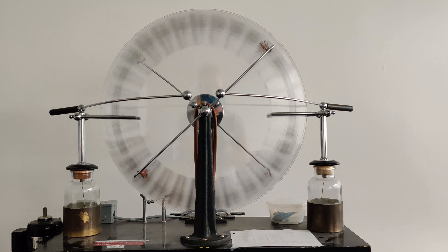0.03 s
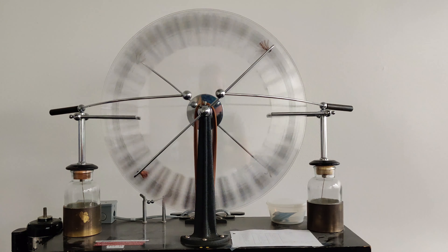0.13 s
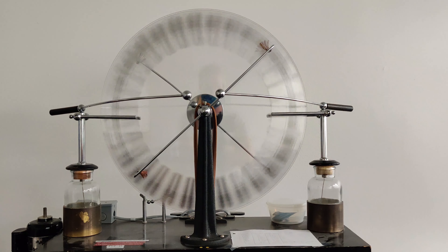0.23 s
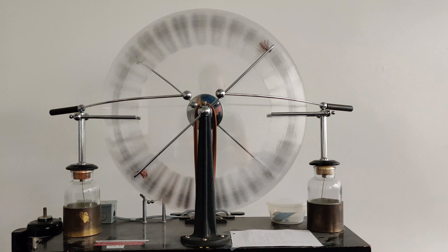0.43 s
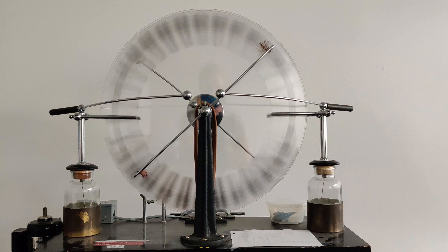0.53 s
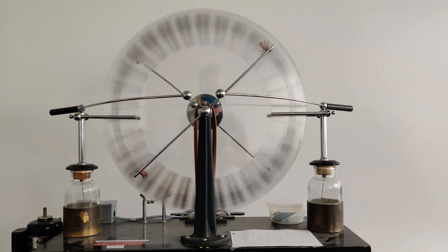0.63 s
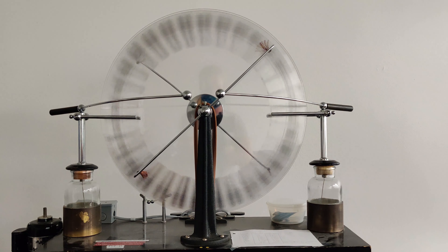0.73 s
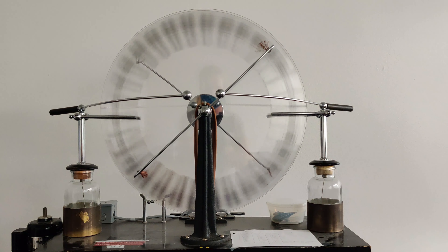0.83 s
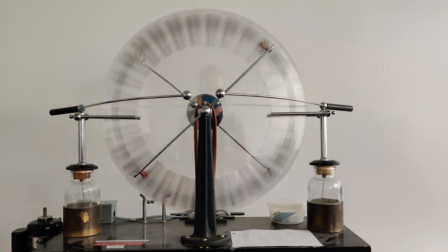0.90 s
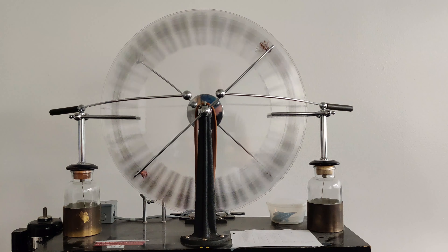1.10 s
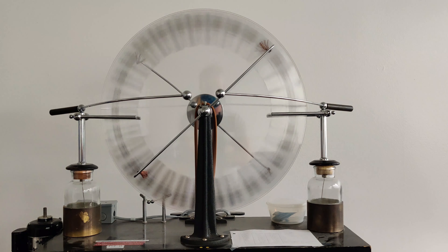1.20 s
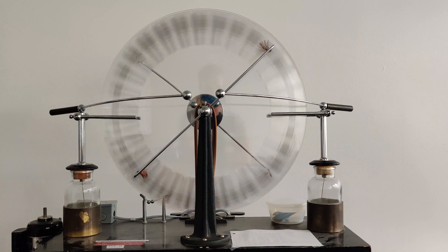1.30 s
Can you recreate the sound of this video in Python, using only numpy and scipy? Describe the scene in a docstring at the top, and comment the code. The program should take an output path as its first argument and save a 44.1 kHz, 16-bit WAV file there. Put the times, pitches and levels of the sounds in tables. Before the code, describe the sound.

A single loud spark snaps and echoes briefly while a hand-cranked generator turns quietly.

```python
"""A hand-cranked spark machine

An electrostatic machine turns in a small hard room: its discs rumble, its brushes hiss and tick, its
drive knocks and the table hums along. One big spark jumps the gap: a sharp crack, a few quick
reflections and a bright room tail. The spark upsets the microphones: they go quieter for a tenth
of a second, and their bias (resting voltage) thumps and swings slowly back."""
import sys
import numpy as np
from scipy import signal
from scipy.fft import rfft, irfft
from scipy.io import wavfile
from scipy.ndimage import uniform_filter1d

SR = 44100
rng = np.random.default_rng(int(sys.argv[2]) if len(sys.argv) > 2 else 0)


def to_wav(s):
    """Save 16-bit WAV."""
    ch = np.atleast_2d(s).T  # columns
    pcm = np.round(np.clip(ch, -1, 1) * 32767)  # PCM
    wavfile.write(sys.argv[1], SR, pcm.astype(np.int16))


N = 59535

# Each TONE table gives only the balance of low and high pitches; loudness is set separately.
# the crack and its near reflections: delay_s, left_db, right_db
CRACK_PATHS = [(0, 7, 7), (.00122, -1, -1), (.0032, -5, -3), (.0061, -3, -3), (.0117, -10, -10)]
# tone of the crack: pitch_hz, level_db
CRACK_TONE = [(100, -36.5), (400, 3), (1000, 3.5), (1500, -11), (2500, -2.5), (4700, 2.5), (7000, -3),
              (11000, -0.5), (15000, 1), (17000, 6.5)]
# starting tone of the room tail and its time to fade by 60 dB: pitch_hz, level_db, fade_s
ROOM_TONE = [(150, -18, 0.47), (503, -20, 1), (1050, -8, 0.83), (1780, -3, 0.9), (3020, -2, 1.0),
             (4760, 2, 1), (6980, -4, 0.8), (8340, 0.5, 0.6), (10970, 0.5, 0.44), (15100, 7.5, 0.31),
             (17000, -2, 0.4)]
# late echoes that stand out of the tail: delay_s, width_s, boost_db
LATE_ECHOES = [(.1565, 0.0028, 4.5), (0.2187, 0.00081, 10.5)]
# the stronger brush sparks: start_s, relative_db
LOUD_TICKS = [(.0033, -21.5), (.0072, -23), (0.0305, -22), (0.035, -25), (0.0568, -21), (.0614, -22.5),
              (.1119, -28), (.1167, -25), (0.1294, -29), (0.1642, -19), (0.6567, -29.5), (1.0448, -26.5),
              (1.0963, -27), (1.3196, -25)]
# tone of a brush spark: pitch_hz, level_db
TICK_TONE = [(500, -14), (2000, -25), (5000, -6.5), (8000, 3), (12000, 3), (15000, 6), (17000, 1)]
# knocks in the drive: start_s, relative_db
DRIVE_KNOCKS = [(0.091, -16.5), (0.111, -12), (0.566, -10), (0.5905, 3), (.6137, -2), (0.629, -7.5),
                (0.651, -10), (0.948, -10.5), (0.962, -9), (1.093, -15), (1.109, -21.5)]
# notes of the knocked part, with time to fade by 60 dB: pitch_hz, relative_db, fade_s
DRIVE_NOTES = [(1314, 0.5, .034), (1410, -32, 0.024), (2130, -19, 0.033), (2750, -16.5, 0.033),
               (3010, -23, 0.019)]
# tone of the click as parts meet: pitch_hz, level_db
CLICK_TONE = [(300, -15), (1300, 2), (2800, -1), (4000, -15), (12000, -28)]
# tone of the turning discs: pitch_hz, level_db
DISC_TONE = [(20, -6), (100, -11), (200, -5), (300, -4), (400, -4.5), (600, -5.5), (850, -5.5),
             (1100, -10.5), (1600, -22), (3000, -20), (6000, -37.5), (16000, -64)]
# pitches where the discs ring: pitch_hz, width_hz, boost_db
DISC_PEAKS = [(496, 46, 7.5), (534, 24, 7.9), (667.3, 24, 6.5), (781.4, 36, 7.2), (973, 116, 3.5),
              (1330, 93, 10.6), (1672, 39, 11.3), (2444, 57, 11.5), (2660, 100, 5)]
# swell of the disc rumble: time_s, level_db
DISC_SWELL = [(0, -49.5), (.17, -49.5), (.35, -48), (.5, -44.5), (.61, -43), (.7, -46), (.82, -46),
              (.92, -44), (1.03, -46), (1.35, -51)]
# tone of the rubbing brushes: pitch_hz, level_db
HISS_TONE = [(300, 1.5), (1700, 0.5), (3000, 3.5), (3800, -4.5), (5600, -7), (8000, -5), (11000, -5),
             (13500, -0.5), (15300, 6), (16500, 0.5)]
# pitches where the brushes ring: pitch_hz, width_hz, boost_db
HISS_PEAKS = [(4180, 480, 6), (4760, 250, 15.2), (5990, 180, 9), (6520, 320, 8.9)]
# swell of the brush hiss: time_s, level_db
HISS_SWELL = [(0, -46), (.18, -48.5), (.4, -47.5), (.8, -50), (1.35, -48)]
# tone of the table's rumble: pitch_hz, level_db
TABLE_TONE = [(13, 13), (25, 7), (50, 2), (100, -0.5), (160, -5), (260, -11.5), (500, -24.5), (2000, -47)]
# pitch where the table rings: pitch_hz, width_hz, boost_db
TABLE_PEAKS = [(189.2, 21, 11.4)]
# jolts to the microphones' bias: start_s, left_size, right_size, rise_s, left_swing_hz, left_decay_s
BIAS_JOLTS = [(.1907, .11, .33, .0004, 4.2, .09), (.2825, 0, -.13, .002, 1.0, .25),
              (.3042, -.15, -.15, .0014, 1.05, .25), (.3045, -.28, -.52, .013, 1.03, .32)]

SPARK_S, CRACK_DB, ROOM_DB = .1903, 12.5, -14.5
SIDES = np.array([[1], [-1]])  # plus for left, minus for right
LEAN_LEFT_DB = 2.5  # discs and drive are this much louder on the left


def spark():
    """The big spark cracks, bounces off the table, discs and wall, then fills the room."""
    cracks = sum(snap(SPARK_S + delay_s) * undb([[left_db], [right_db]])
                 for delay_s, left_db, right_db in CRACK_PATHS)
    return undb(CRACK_DB) * colour(cracks, CRACK_TONE) + undb(ROOM_DB) * room_tail(SPARK_S)


def snap(start_s):
    """A spike of air pressure, a little later on the right, then a brief scatter off nearby metal."""
    right_lag_s, scatter_s = .00005, .00076
    t = since(start_s)
    spike = np.sinc(np.arange(N) - np.round(start_s * SR) - np.array([[0], [right_lag_s * SR]]))
    out = spike + .22 * noise() * np.exp(-t / scatter_s) * (t > 0)
    return out / np.sqrt(np.sum(out ** 2, axis=1, keepdims=True))


def room_tail(start_s):
    """Echoes off the hard walls blur into a wash of noise; the high treble dies soonest."""
    build_s, early_s = .0017, .0059
    t = since(start_s)
    hz = np.maximum(np.fft.rfftfreq(N, 1 / SR), 1)
    band_hz, _, fades_s = np.array(ROOM_TONE).T
    wash = rfft(colour(noise(), ROOM_TONE))
    tail = 0
    for band, fade_s in zip(np.eye(len(band_hz)), fades_s):
        share = np.interp(np.log(hz), np.log(band_hz), band)
        tail += irfft(wash * share, N) * fade(t, fade_s)
    echo_db = sum(db * np.exp(-((t - delay_s) / width_s) ** 2) for delay_s, width_s, db in LATE_ECHOES)
    ripple_db = .6 * wander(rate_hz=120.5)
    early_lift = 1 + undb(-32) * np.exp(-t / early_s)
    return tail * undb(echo_db + ripple_db) * rise(t, build_s) * early_lift


def brush_sparks():
    """A tiny spark ticks as each foil patch on the discs passes a brush; some are much stronger."""
    patch_hz, small_db, spread_db, tail_db = 38.9, -35.5, 1.5, -42.5
    ticks = sum(undb(db + 1.5) * snap(start_s) for start_s, db in LOUD_TICKS)
    for patch, (late, size) in enumerate(rng.standard_normal((int(N / SR * patch_hz), 2))):
        start_s = (patch + .5 + .08 * late) / patch_hz
        ticks[:, int(start_s * SR) % N] += undb(small_db + spread_db * size)
    tail = signal.fftconvolve(ticks, room_tail(0), axes=1)[:, :N]
    return colour(ticks, TICK_TONE) + undb(tail_db) * tail


def drive_knocks():
    """The loose drive rattles: each knock clicks and sets the same part ringing."""
    knock_db, ring_rise_s, pitch_spread = -14.5, .012, .0022
    click_db, click_s = -19.5, .0024
    tunings = 1 + pitch_spread * rng.standard_normal((len(DRIVE_KNOCKS), len(DRIVE_NOTES)))
    out = np.zeros((2, N))
    for (start_s, db), tuning in zip(DRIVE_KNOCKS, tunings):
        t = since(start_s)
        ring = sum(undb(note_db) * np.sin(2 * np.pi * hz * tune * t) * fade(t, fade_s)
                   for (hz, note_db, fade_s), tune in zip(DRIVE_NOTES, tuning))
        burst = noise() * np.exp(-t / click_s) * (t > 0)
        click = undb(click_db) * colour(burst, CLICK_TONE)
        out += undb(db + knock_db) * (ring * rise(t, ring_rise_s) + click)
    return out * undb(SIDES * LEAN_LEFT_DB / 2)


def disc_rumble():
    """Discs and bearings rumble through the frame, swelling with the crank."""
    rumble = wide_noise(DISC_TONE, DISC_PEAKS, width_db=-7)
    flutter_db = wander(rate_hz=35)
    return rumble * undb(SIDES * LEAN_LEFT_DB / 2 + flutter_db) * swell(DISC_SWELL)


def brush_hiss():
    """The brushes hiss as they rub on the discs."""
    hiss = colour(noise(), HISS_TONE, HISS_PEAKS)
    flutter_db = .13 * wander(rate_hz=26)
    return hiss * swell(HISS_SWELL) * undb(flutter_db)


def table_rumble():
    """The table under the machine rumbles evenly, much the same on both sides."""
    return undb(-45.5) * wide_noise(TABLE_TONE, TABLE_PEAKS, width_db=-20)


def microphone_dip():
    """The spark makes the microphones less sensitive; they wake again, the right a little sooner."""
    dip_db, wake_s, wake_rise_s = -10.5, .299, .0087
    early_wake_s, early_share = .263, .24
    left = rise(since(wake_s), wake_rise_s)
    right = (1 - early_share) * left + early_share * rise(since(early_wake_s), wake_rise_s)
    awake = np.array([left, right])
    struck = since(SPARK_S - 2 / SR) > 0
    return 1 - (1 - undb(dip_db)) * struck * (1 - awake)


def bias_swing():
    """Each electrical jolt thumps, then settles in a slow, fading swing."""
    out = np.zeros((2, N))
    for start_s, left, right, rise_s, swing_hz, decay_s in BIAS_JOLTS:
        t = since(start_s)
        settling = np.array([t, t / 1.276])  # the right side settles more slowly
        swing = np.exp(-settling / decay_s) * np.cos(2 * np.pi * swing_hz * settling)
        out += np.array([[left], [right]]) * rise(t, rise_s) * swing
    return out


def undb(db):
    """Turn decibels into a number to multiply by."""
    return 10 ** (np.asarray(db) / 20)


def since(start_s):
    """Seconds since an event, zero before it."""
    return np.maximum(np.arange(N) / SR - start_s, 0)


def rise(t, rise_s):
    """Climb smoothly from 0 towards 1."""
    return 1 - np.exp(-t / rise_s)


def fade(t, fade_s):
    """Die away by 60 dB every fade_s seconds."""
    return np.exp(-np.log(1000) * t / fade_s)


def swell(points):
    """Loudness that follows rows of time_s, level_db."""
    return undb(np.interp(since(0), *np.array(points).T))


def wander(rate_hz):
    """A smooth random wobble with a typical size of 1."""
    step = int(SR / rate_hz)
    steps = np.repeat(rng.standard_normal(N // step + 2), step)
    smooth = uniform_filter1d(steps, step)[:N]
    return smooth / smooth.std()


def noise():
    """Separate white noise for left and right."""
    return rng.standard_normal((2, N))


def wide_noise(tone, peaks, width_db):
    """Shaped noise in the middle, plus a weaker one that makes left and right differ."""
    middle, side = colour(noise(), tone, peaks)
    return middle + undb(width_db) * SIDES * side


def colour(sound, tone, peaks=()):
    """Give a sound a tone and ringing peaks; white noise keeps its overall power."""
    hz = np.maximum(np.fft.rfftfreq(2 * N, 1 / SR), 1)
    tone_hz, tone_db = np.array(tone).T[:2]
    peak_db = sum(db / (1 + (2 * (hz - peak_hz) / width_hz) ** 2) for peak_hz, width_hz, db in peaks)
    gain = undb(np.interp(np.log(hz), np.log(tone_hz), tone_db) + peak_db)
    gain /= np.sqrt(np.mean(gain ** 2))
    # fold the filter in time so it rings after a hit, never before
    cepstrum = irfft(np.log(gain))
    cepstrum[1:N] *= 2
    cepstrum[N + 1:] = 0
    return irfft(rfft(sound, 2 * N) * np.exp(rfft(cepstrum)))[..., :N]


def scene():
    """One big spark over the running machine."""
    return spark() + brush_sparks() + drive_knocks() + disc_rumble() + brush_hiss() + table_rumble()


def record(dry):
    """The upset microphones dip and thump, then the highest treble is cut."""
    top_hz = 15780
    treble_cut = signal.ellip(10, .2, 80, top_hz, fs=SR, output="sos")
    return signal.sosfilt(treble_cut, dry * microphone_dip() + bias_swing())


dry = scene()
out = record(dry)
to_wav(out)
```